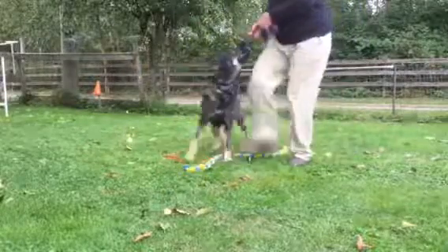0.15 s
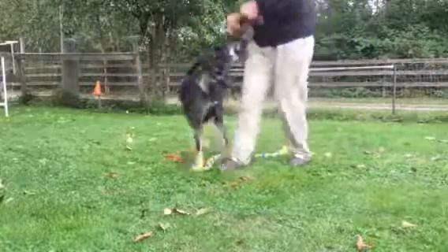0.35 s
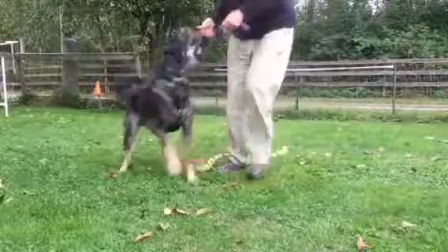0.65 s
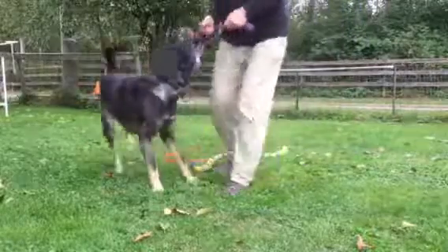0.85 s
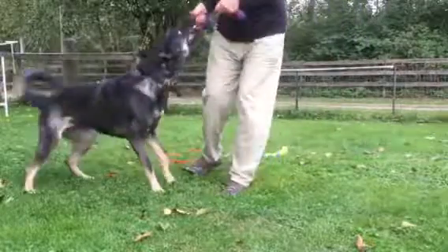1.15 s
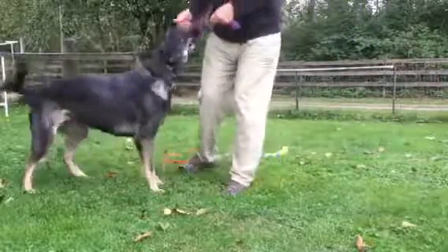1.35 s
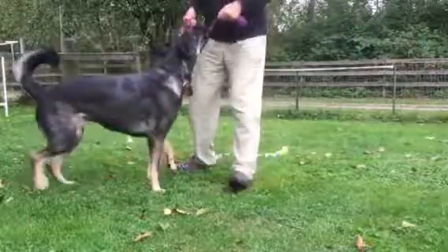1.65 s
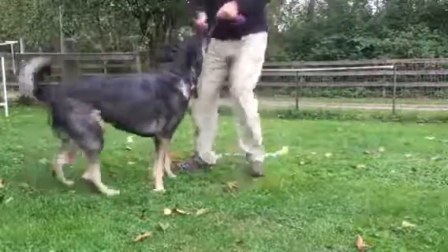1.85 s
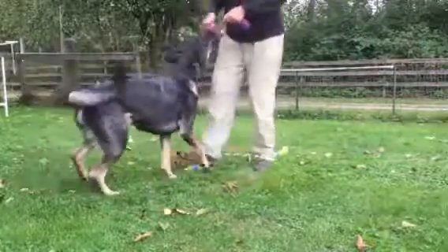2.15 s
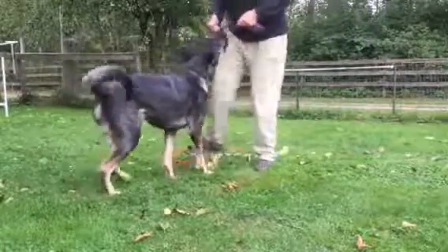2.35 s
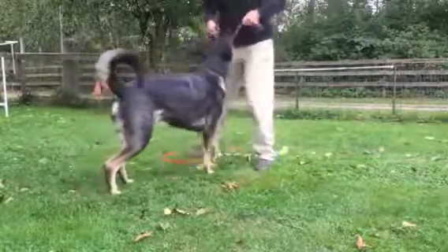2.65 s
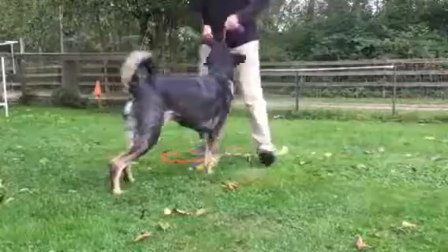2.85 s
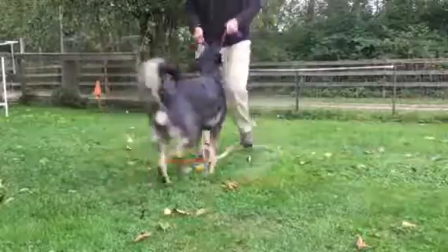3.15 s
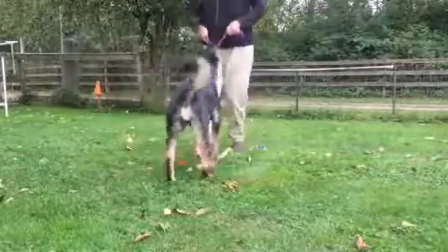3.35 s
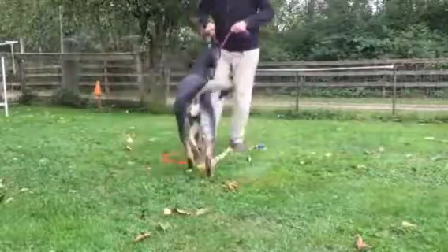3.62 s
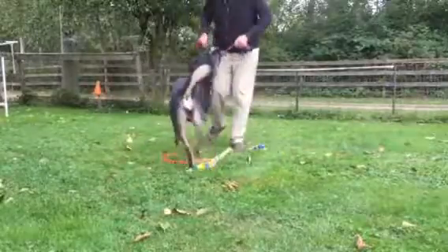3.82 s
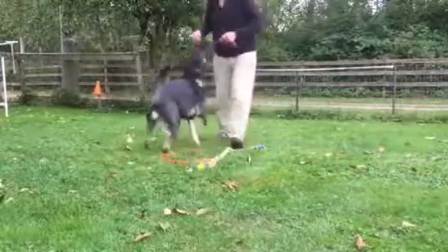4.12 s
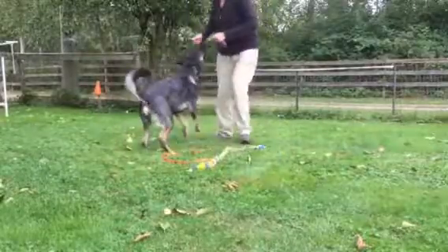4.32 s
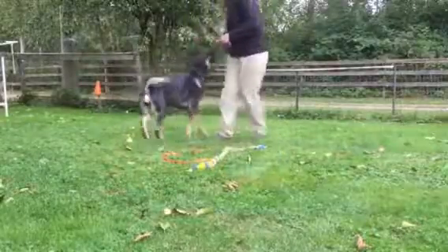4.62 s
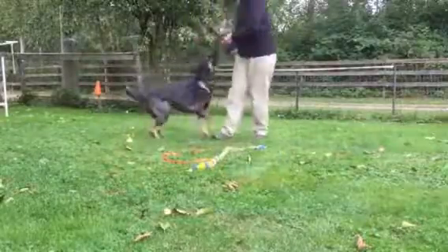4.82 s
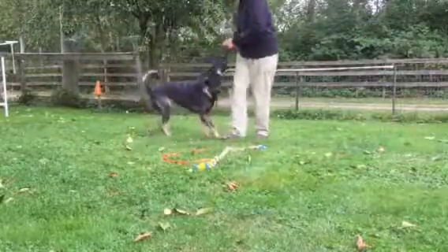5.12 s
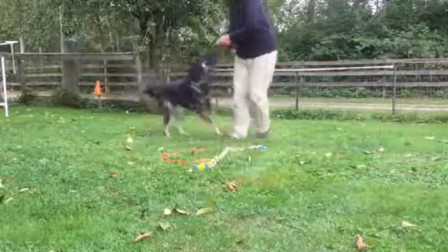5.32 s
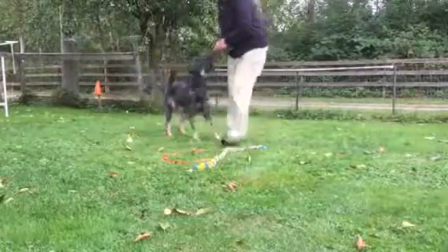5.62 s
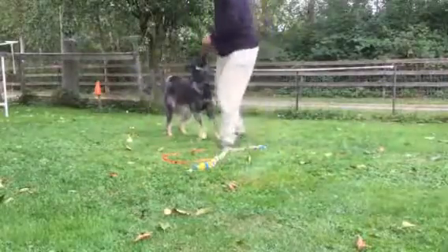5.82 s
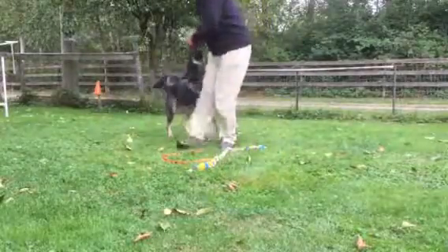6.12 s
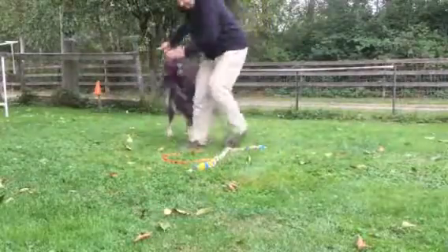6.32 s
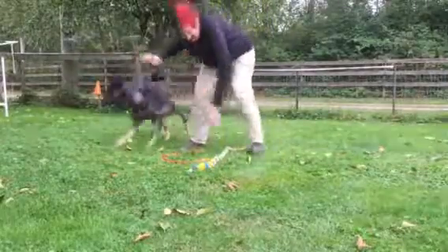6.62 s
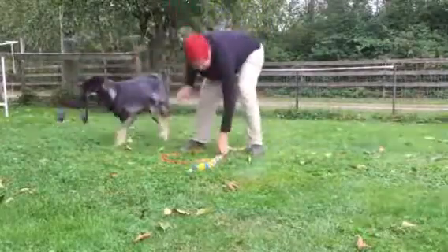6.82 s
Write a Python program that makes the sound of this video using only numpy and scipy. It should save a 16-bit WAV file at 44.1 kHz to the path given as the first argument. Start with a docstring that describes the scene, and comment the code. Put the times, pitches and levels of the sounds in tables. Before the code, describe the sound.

Repeated low, rough dog growls with brief pauses, light scuffs and small ticks in grass, over a soft steady yard hush.

```python
"""The tail of a throaty growl opens the scene, then a dog growls in short bursts, tugging a toy on a lawn.
Uneven vocal folds hum in the chest; their snaps and puffs of breath rasp through resonances of throat and mouth.
Paws and shoes rustle the grass as crackling shaped noise; ticks, thuds and taps are short decaying bursts.
Under it all lies the quiet air of the yard, a steady hush of shaped noise with a lumpy bass."""
import sys
import numpy as np
from scipy import signal
from scipy.fft import rfft, irfft
from scipy.io import wavfile
from scipy.ndimage import uniform_filter1d

SR = 44100
rng = np.random.default_rng(int(sys.argv[2]) if len(sys.argv) > 2 else 0)


def generate_wav(sig):
    """Save sig (samples, or channels by samples) to the path in sys.argv[1] as 16-bit PCM at SR."""
    pcm = np.round(np.clip(np.atleast_2d(sig).T, -1, 1) * 32767).astype(np.int16)
    wavfile.write(sys.argv[1], SR, pcm)


N = 307377  # length [samples]

# Spectrum of the yard air: (frequency [Hz], relative level [dB])
AIR_SPECTRUM = [(18, -55), (30, 13.5), (109, 1), (461, -13.5), (1010, -13.5), (1590, -13.5), (4190, -21.5),
                (13000, -28), (16000, -31)]
# Spectrum of rustling grass: (frequency [Hz], relative level [dB])
GRASS_SPECTRUM = [(1880, -67), (3200, -18.5), (4330, -10.5), (5670, -11), (10500, -15.5), (12300, -16.5),
                  (16000, -20.5)]
# Steady shuffle in the grass: (time [s], level [dB])
SHUFFLE_LEVELS = [(0, -82.5), (1.0, -85.5), (2.0, -76), (2.5, -90), (3.2, -81), (4.3, -85.5), (5.8, -81),
                  (6.97, -86.5)]
# Scuffs of grass and cloth: (time [s], peak level [dB], rise per 10 dB [s], fade per 10 dB [s])
SCUFF_EVENTS = [(0.0, -64.5, .01, 0.011), (.352, -65.5, 0.019, 0.047), (0.541, -67.5, 0.0087, 0.019),
                (0.791, -50.5, 0.0052, 0.052), (.85, -56, 0.059, 0.05), (1.08, -66, 0.018, 0.07),
                (1.19, -67.5, 0.035, 0.063), (1.98, -67, 0.025, 0.014), (2.1, -65.5, 0.048, 0.029),
                (2.99, -66, 0.034, 0.19), (3.63, -66, 0.019, 0.007), (3.79, -73.5, 0.12, 0.075),
                (4.735, -69, 0.022, 0.014), (4.8, -58, 0.018, 0.022), (6.97, -77.5, 0.033, .03)]
# Dry ticks: (time [s], level [dB])
TICK_EVENTS = [(0.3555, -37.5), (0.383, -49), (0.791, -55), (1.8617, -49), (2.2864, -51), (2.9796, -52),
               (3.618, -48), (3.8804, -53), (4.7255, -53)]
# Soft paw falls: (time [s], level before the thud envelope [dB])
THUD_EVENTS = [(0.613, -49), (2.614, -50), (6.691, -54)]
# Short faint taps between growls: (time [s], level before the tap envelope [dB], ring [Hz])
TAP_EVENTS = [(1.701, -56, 1210), (1.715, -57, 1610), (1.735, -56, 1260), (1.803, -55.5, 420),
              (5.709, -53.5, 291.7)]
# Folds slapping shut harder than usual: (time [s], relative drive [dB])
HARD_SLAPS = [(0.748, -27), (0.883, -20), (0.91, -16), (1.002, -25), (1.22, -23), (1.281, -23),
              (1.307, -24), (1.337, -20), (1.462, -32.5), (2.268, -46), (3.034, -26), (3.118, -28),
              (3.602, -33), (3.674, -24.5), (3.827, -43), (4.116, -26.5), (4.712, -24.5), (5.961, -35),
              (5.99, -34), (6.224, -29)]
# Character, one row a growl: (unevenness of cycle length [ratio], breath share [0-1],
# mouth level within the upper rasp [dB], teeth level within it [dB], topmost hiss [dB])
GROWL_CHARACTERS = [(.16, 0.69, -7, -0.5, -14), (0.48, 0.5, 1.5, -3, -16), (.13, 0.71, -4.5, -1.5, -27),
                    (.14, 0.71, -5, -1.5, -16.5), (.17, 0.77, -1.5, -5.5, -20.5), (.14, 0.66, -1, -4.5, -9),
                    (0.09, 0.61, -1.5, -3, -10), (.12, 0.75, -2, -4.5, -19), (0.337, 0.81, -1.5, 4, -5)]
# Voice path, one table a growl: (time [s], throat level [dB], upper rasp above the throat [dB],
# relative hum level [dB], throat resonance [Hz], mouth resonance [Hz], teeth resonance [Hz])
VOICE_PATHS = [
    [(0.0, -39.5, -15, -26, 670, 1270, 2020), (0.024, -61, 4, -40, 694, 1220, 2150),
     (0.07, -62.5, 5, -49, 695, 1360, 2150)],
    [(0.335, -73.5, 9, -75, 885, 1240, 2050), (0.371, -61, -8, -51, 670, 1230, 2070),
     (0.393, -55.5, -2.5, -44.5, 653, 1370, 1820), (0.413, -71.5, 16.5, -46.5, 600, 1480, 1750),
     (0.44, -84, 16, -53, 520, 1440, 1840)],
    [(0.755, -58, 8.5, -43, 678, 1370, 2270), (0.805, -43, -10, -36, 650, 1230, 2230),
     (0.923, -47, -7, -35, 710, 1510, 1700), (0.991, -52.5, 6, -35.5, 670, 1240, 1950),
     (1.077, -49.5, -2.5, -35.5, 680, 1330, 2285), (1.231, -47, -4, -34, 722, 1040, 1680),
     (1.29, -48.5, -1.5, -34, 705, 1140, 1740), (1.38, -51.5, -1, -35.5, 670, 1200, 1890),
     (1.47, -57, 6.5, -44, 705, 1230, 1930), (1.575, -67, 4.5, -52.5, 806, 1360, 2040)],
    [(1.9, -55, 0.5, -44, 670, 1250, 1880), (1.952, -47.5, -5, -41, 666, 1120, 1987),
     (1.992, -56.5, -3.5, -40, 606, 1100, 2030), (2.1, -56, 6, -39.5, 687, 1290, 2070),
     (2.264, -49.5, -2, -35, 655, 1216, 1780), (2.302, -46.5, -6, -35.5, 720, 1380, 1760),
     (2.33, -66.5, 18, -44, 740, 1550, 2270), (2.375, -56, 1, -53, 894, 1400, 1920)],
    [(2.805, -56.5, 3.5, -43.5, 670, 1160, 2136), (2.879, -48.5, -6, -37.5, 700, 1200, 2010),
     (2.951, -45, -6, -38, 677, 1160, 1710), (3.039, -50.5, -4.5, -36.5, 700, 1170, 1810),
     (3.129, -46.5, 0, -34.5, 693, 1310, 2160), (3.235, -63, 5.5, -49, 660, 1350, 2250)],
    [(3.605, -54.5, -14.5, -45, 693, 1140, 2130), (3.665, -54.5, -3, -43, 607, 1450, 1850),
     (3.8, -54.5, -1, -34, 763, 1240, 1990), (3.893, -57, 2, -40, 690, 1320, 2310),
     (3.947, -57.5, 7, -37.5, 429, 1170, 2010), (4.04, -64.5, 3.5, -46, 410, 1320, 2000),
     (4.129, -52, -8, -38, 630, 1280, 2140), (4.16, -71, 10.5, -55, 593, 1287, 1990)],
    [(4.67, -59.5, -4, -47.5, 471, 1290, 1890), (4.724, -48.5, -10.5, -38.5, 428, 1300, 1980),
     (4.8, -66.5, 0.5, -49, 428, 1300, 2050), (4.9, -60.5, -5, -46.5, 410, 1320, 1820),
     (4.99, -48, -6.5, -40, 435, 1260, 1900), (5.13, -62, 0, -45, 450, 1240, 1790),
     (5.28, -50, -2, -42, 426.6, 1307, 2040), (5.375, -72.5, 8, -53, 426.9, 1360, 1980)],
    [(5.785, -56.5, 3.5, -50, 490, 1250, 2170), (5.819, -55, 0.5, -41.5, 455, 1152, 1850),
     (5.889, -57.5, -4.5, -44, 387, 1150, 1800), (5.945, -60.5, 8, -41.5, 490, 1290, 1930),
     (5.997, -50, 3.5, -38.5, 423, 1310, 2340), (6.141, -62.5, 3.5, -46.5, 390, 1195, 2230),
     (6.21, -70.5, 6.5, -52.5, 647, 1300, 1600), (6.232, -51.5, -1, -45.5, 647, 1390, 1550),
     (6.267, -79, 10, -47.5, 500, 1300, 1650), (6.299, -56, -11, -48, 460, 1200, 1710),
     (6.345, -67.5, 15, -45, 565, 1370, 2030), (6.39, -62.5, 8.5, -59, 806, 1380, 2330)],
    [(6.94, -80, 13, -90, 506, 1550, 2250), (6.97, -77, 15, -77, 493, 1540, 2380)],
]
# Fold path, one table a growl: (time [s], fold rate [Hz], level of the rasp at the lips [dB])
FOLD_PATHS = [
    [(0, 91.7, -59.5), (.07, 80.4, -63)],
    [(.35, 71.83, -95), (.44, 76.5, -92)],
    [(.76, 104.7, -56), (.92, 135.9, -60), (1.0, 112.1, -63.5), (1.19, 120.2, -63), (1.4, 99.9, -74),
     (1.474, 97.5, -65), (1.575, 87.3, -69)],
    [(1.9, 84.8, -64), (1.94, 90.3, -77), (1.98, 105.4, -55), (2.05, 113.9, -77), (2.234, 109, -58),
     (2.282, 116.8, -63), (2.334, 118.6, -54), (2.375, 119.8, -63.5)],
    [(2.805, 116.6, -75), (2.92, 118, -73), (3.0, 132.6, -58), (3.044, 129.3, -75), (3.204, 120.9, -58),
     (3.235, 113, -71)],
    [(3.605, 120.2, -80), (3.68, 144.7, -76), (3.77, 118.2, -65.5), (3.964, 116.9, -80), (4.07, 124.9, -87),
     (4.16, 110, -67.5)],
    [(4.67, 107.6, -68), (4.74, 124, -67), (4.86, 120.7, -75), (4.92, 120.3, -70), (5.03, 123.6, -68),
     (5.09, 121.7, -79), (5.3, 122, -70), (5.375, 100.1, -93)],
    [(5.785, 95.57, -68), (5.848, 103.5, -92), (5.966, 120.2, -58), (6.06, 120, -66), (6.19, 97.6, -85),
     (6.31, 100.4, -77), (6.364, 95.8, -51.5), (6.39, 97.3, -58)],
    [(6.94, 98.9, -74), (6.97, 101, -57)],
]

AIR_DB = -67
ATTACK_DB_PER_S, HUM_RELEASE_DB_PER_S, RASP_RELEASE_DB_PER_S = 1092, 894, 456
EDGE_S = .05  # room left for attack and release
SLAP_BOOST_DB = 20.5
FALTER_DB = -6
BAND_LIMIT_HZ = 15800


def gain_of(db):
    """Turns decibels into an amplitude factor."""
    return 10 ** (np.asarray(db) / 20)


def evened(x):
    """Scales a sound to an rms of one."""
    return x / np.sqrt(np.mean(x ** 2) + 1e-20)


def add(mix, start_s, sound):
    """Lays a sound into the mix, cut off at the end of the mix."""
    part = mix[round(start_s * SR):][:len(sound)]
    part += sound[:len(part)]


def resonate(x, hz, width):
    """Shifts the curve hz down to zero, smooths twice, and shifts back: a steep moving resonance."""
    turn = np.exp(2j * np.pi * np.cumsum(hz * np.ones(len(x))) / SR)
    r = np.exp(-np.pi * width / SR)
    smooth = signal.lfilter([(1 - r) ** 2], [1, -2 * r, r * r], x / turn + 1e-18)
    return 2 * (turn * smooth).real


def wobble(size, hz):
    """Smooth chance that changes about hz times a second, from twice-averaged noise."""
    span = max(round(SR / hz / 2), 1)
    once = uniform_filter1d(rng.standard_normal(size), span)
    return evened(uniform_filter1d(once, span))


def coloured(spectrum):
    """Noise with the given spectrum, its level drawn straight between points on a log frequency scale."""
    f, db = np.transpose(spectrum)
    hz = np.fft.rfftfreq(N, 1 / SR)
    shape = gain_of(np.interp(np.log(hz + 1), np.log(f + 1), db))
    return evened(irfft(rfft(rng.standard_normal(N)) * shape, N))


def air():
    """The steady hush of the yard; its bass comes in lumps with the breeze."""
    hush = gain_of(AIR_DB) * coloured(AIR_SPECTRUM)
    low = signal.lfilter(*signal.butter(2, 250, fs=SR), hush)
    lumps = evened(gain_of(4.7 * wobble(N, 31)))
    return hush - low + low * lumps


def rustle():
    """Hiss of bending blades, made crackly by quick random changes of level."""
    t = np.arange(N) / SR
    power = gain_of(np.interp(t, *np.transpose(SHUFFLE_LEVELS))) ** 2
    for s, db, rise_s, fade_s in SCUFF_EVENTS:
        drop_db = 10 * np.maximum((t - s) / fade_s, (s - t) / rise_s)
        power = power + gain_of(db - drop_db) ** 2
    crackle = gain_of(3.2 * wobble(N, 500) + 2.2 * wobble(N, 60))
    return np.sqrt(power) * evened(coloured(GRASS_SPECTRUM) * crackle)


def small_sounds():
    """Ticks are a bright snap with a puff of noise, thuds a few low cycles, taps a click that rings briefly."""
    out, t = np.zeros(N), np.arange(4000) / SR
    bright = coloured(GRASS_SPECTRUM)
    snap = gain_of(-60 * t / .0016) * np.sin(2 * np.pi * 7800 * t)
    puff_shape = gain_of(-13 - 60 * t / .012)
    for k, (s, db) in enumerate(TICK_EVENTS):
        puff = puff_shape * bright[4000 * k:][:4000]
        add(out, s, gain_of(db) * (snap + puff))
    thud = t / 0.019 * np.exp(1 - t / 0.0093) * np.sin(2 * np.pi * 105 * t)
    for s, db in THUD_EVENTS:
        add(out, s, gain_of(db) * thud)
    for s, db, hz in TAP_EVENTS:
        grit = evened(rng.standard_normal(len(t)))
        ring = evened(resonate(grit, hz, .6 * hz)) + .4 * evened(resonate(grit, 1700, 1500))
        shape = np.minimum(t / 0.00095, 1) * np.exp(-t * hz / 5.0 - t / 0.018)
        add(out, s, gain_of(db) * shape * ring)
    return out


def airway(drive, throat_hz, mouth_hz, teeth_hz, hiss_db):
    """The four groups of resonances between folds and lips: throat, mouth, teeth and lips."""
    size = len(drive)
    # the tugged jaw trembles
    throat_hz, mouth_hz, teeth_hz = (f * (1 + .022 * wobble(size, 25)) for f in (throat_hz, mouth_hz, teeth_hz))

    throat = resonate(drive, throat_hz, 131) + 0.54 * resonate(drive, 1.262 * throat_hz, 90)
    throat = throat - 0.31 * resonate(drive, 0.707 * throat_hz, 83)
    throat = throat + 0.47 * resonate(drive, 388, 47) - 0.079 * resonate(drive, 968, 170)

    mouth = resonate(drive, mouth_hz, 209)
    teeth = resonate(drive, teeth_hz, 353) - 0.58 * resonate(drive, 700 + 0.839 * teeth_hz, 120)

    flap = wobble(size, 8.8)  # the lips curl and drop, opening the highest resonances
    lips = resonate(drive, 2650 + 120 * flap, 415)
    lips = lips - 0.34 * gain_of(5.2 * flap) * resonate(drive, 3080 + 90 * flap, 120)
    hiss = gain_of(hiss_db + 3 * wobble(size, 14))  # the topmost rasp comes and goes
    top = resonate(drive, 4250 + 150 * flap, 600) + 0.42 * resonate(drive, 6100 - 300 * flap, 500)
    lips = lips + hiss * top

    # a side cavity traps the tones above the mouth
    mouth, teeth = (band - .95 * resonate(band, 1.19 * mouth_hz, 150) for band in (mouth, teeth))
    return np.array([throat, mouth, teeth, lips])


def fold_cycles(t, hz, uneven):
    """Slack folds close unevenly: running count of closings, and the random strength of each."""
    stretch, strength = np.clip(rng.standard_normal((400, 2)), -2, 2).T
    # runs of steady cycles, broken by slips
    closings = np.cumsum(np.exp(uneven * stretch * abs(stretch) / 1.3))
    turns = np.interp(np.cumsum(hz) / SR, closings - closings[0], np.arange(len(closings)) * 1.)
    # each hard slap is one of the closings
    inside = [s for s, db in HARD_SLAPS if t[0] < s < t[-1]]
    hit = np.array([t[0] - 1] + inside + [t[-1] + 1])
    then = np.interp(hit, t, turns)
    nudge = np.interp(t, hit, np.round(then) - then)
    return np.maximum.accumulate(turns + 1 + nudge), strength


def chest_hum(snaps, hz):
    """Each closing thumps the chest, ringing at the fold rate and at fixed low tones."""
    chest = resonate(snaps, hz, 115.7) + 0.48 * resonate(snaps, 145.6, 35)
    chest = chest + 0.22 * resonate(snaps, 235.6, 40) + 1.5 * resonate(snaps, 87.8, 27)
    # closed jaws stop the higher tones
    hum = evened(signal.sosfilt(signal.butter(6, 272, fs=SR, output="sos"), chest))
    return signal.sosfilt(signal.butter(3, 58, "high", fs=SR, output="sos"), hum)


def growl(rows, folds, uneven, breath, mouth_db, teeth_db, hiss_db, slaps):
    """Each closing of the folds thumps the chest and sends a snap and a puff up the airway."""
    s, *columns = np.transpose(rows)
    t = np.arange(max(s[0] - EDGE_S, 0), min(s[-1] + EDGE_S, N / SR), 1 / SR)
    throat_db, open_db, hum_db, throat_hz, mouth_hz, teeth_hz = (np.interp(t, s, c) for c in columns)
    at, *columns = np.transpose(folds)
    hz, lips_db = (np.interp(t, at, c) for c in columns)

    early, late = np.maximum(s[0] - t, 0), np.maximum(t - s[-1], 0)
    hum_db = hum_db - ATTACK_DB_PER_S * early - HUM_RELEASE_DB_PER_S * late
    edges_db = ATTACK_DB_PER_S * early + RASP_RELEASE_DB_PER_S * late
    throat_db, lips_db = throat_db - edges_db, lips_db - edges_db
    upper_db = throat_db + open_db

    turns, strength = fold_cycles(t, hz, uneven)
    cycle = turns.astype(int)
    # strong and weak closings alternate, and the push of air comes in uneven bursts
    force = gain_of(1.1 * strength[cycle] + 1.8 * (-1.) ** cycle)
    force = force * gain_of(.9 * wobble(len(t), 30))
    snaps = np.diff(cycle, prepend=cycle[0]) * force
    hum = chest_hum(snaps, hz)

    puffs = force * (.33 + np.exp(-(turns % 1) / .33)) * rng.standard_normal(len(t))
    puffs = signal.lfilter(*signal.butter(1, 900, "high", fs=SR), evened(puffs))  # breath is thin in the bass
    drive = breath * 1.7 * puffs - (1 - breath) * 1.3 * evened(snaps)
    bands = airway(drive, throat_hz, mouth_hz, teeth_hz, hiss_db)
    # the shaken jaw shifts the balance
    rasp = [evened(band * gain_of(1.1 * wobble(len(t), 20))) for band in bands]
    levels = gain_of([throat_db, upper_db + mouth_db, upper_db + teeth_db, lips_db])

    # hard slaps are shared out much as the rasp is, with teeth and lips held back
    hard = airway(slaps[round(t[0] * SR):][:len(t)], throat_hz, mouth_hz, teeth_hz, hiss_db)
    shares = levels * gain_of([[0], [0], [-1], [-4]]) / np.linalg.norm(levels, axis=0)
    hard = gain_of(SLAP_BOOST_DB) * hard * shares

    voice = gain_of(hum_db + 0.22) * hum + (levels * rasp + hard).sum(0)
    soft_ends = signal.windows.tukey(len(t), min(0.00095 * SR / len(t), 1))
    return t[0], voice * soft_ends


def dog():
    """All growls; the voice falters just before each hard slap, which is a snap and a dying burst of air."""
    out, slaps, falter = np.zeros(N), np.zeros(N), np.zeros(N)
    t = np.arange(1500) / SR
    stall = signal.windows.tukey(620, .5)[:520]  # cut short, so the voice returns at the slap
    noise = rng.standard_normal((len(HARD_SLAPS), len(t)))
    bursts = 0.059 * np.exp(-t / 0.032) * noise - (t == 0)
    for (s, db), burst in zip(HARD_SLAPS, bursts):
        add(slaps, s, gain_of(db) * burst)
        add(falter, s - len(stall) / SR, stall)
    for rows, folds, character in zip(VOICE_PATHS, FOLD_PATHS, GROWL_CHARACTERS):
        add(out, *growl(rows, folds, *character, slaps))
    return out * gain_of(FALTER_DB * uniform_filter1d(falter, size=40))


def scene():
    """Yard air, grass, small knocks and the dog, summed to one channel."""
    return (air() + rustle() + small_sounds() + dog())[None]


def record(dry):
    """The microphone loses the deepest bass and its port has two dips; then the band limit."""
    x = signal.sosfilt(signal.butter(4, 58, "high", fs=SR, output="sos"), dry[0])
    x = x - .5 * resonate(x, 4840, 880) - 0.95 * resonate(x, 10470, 900)
    low_pass = signal.firwin(511, BAND_LIMIT_HZ, window=("kaiser", 9), fs=SR)
    return signal.oaconvolve(x, low_pass, "same")[None]


dry = scene()
out = record(dry)
generate_wav(out)
```